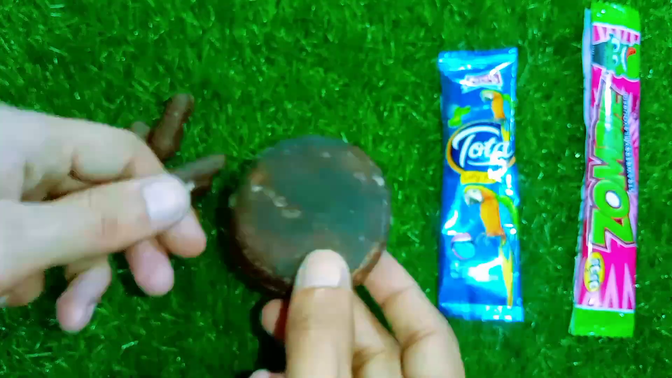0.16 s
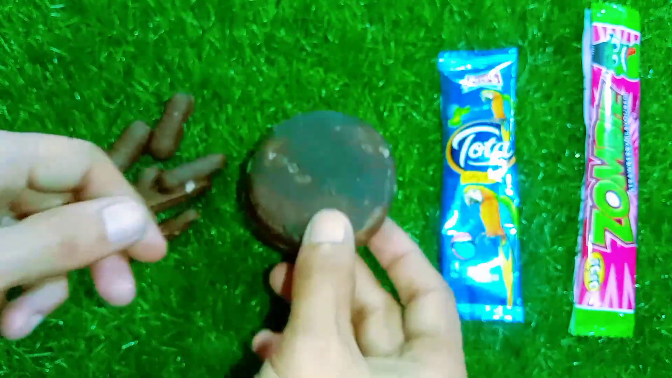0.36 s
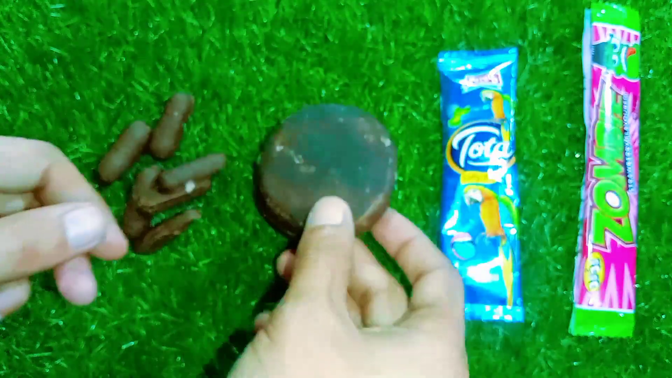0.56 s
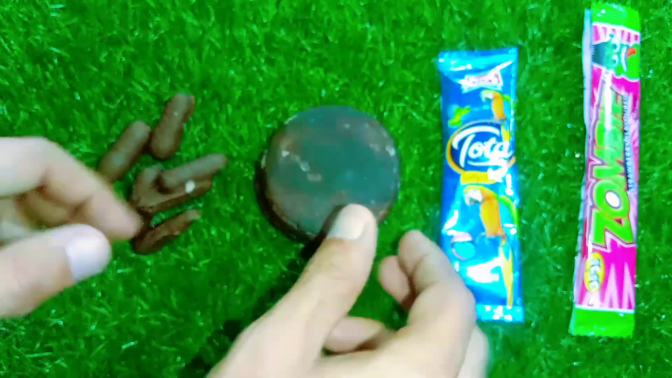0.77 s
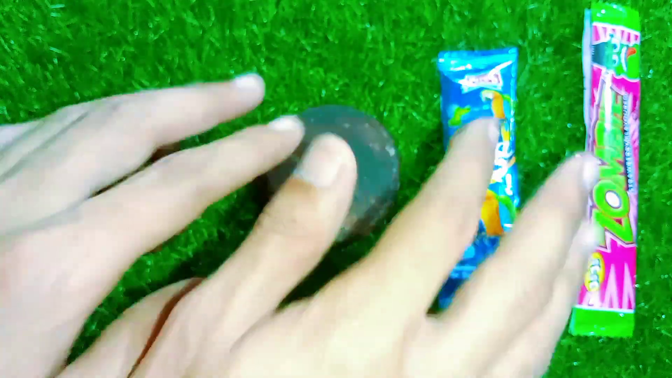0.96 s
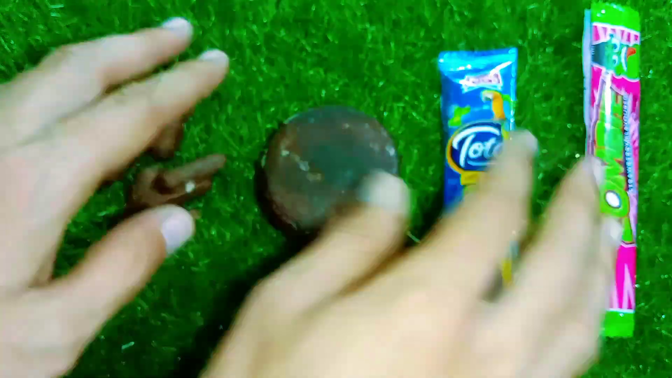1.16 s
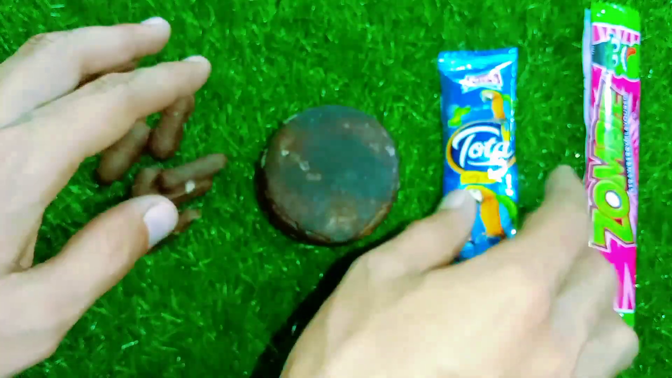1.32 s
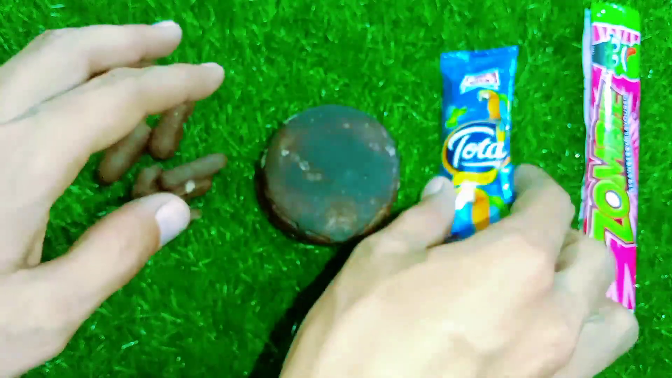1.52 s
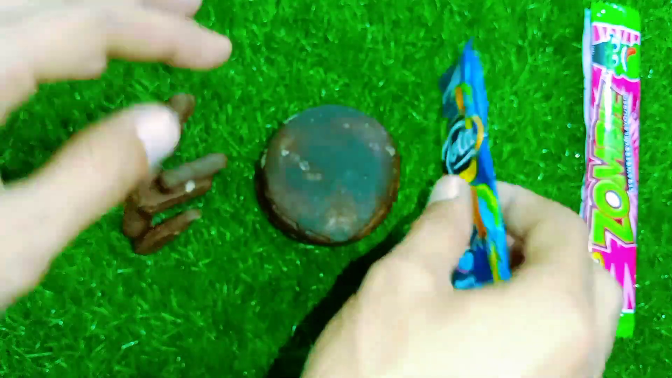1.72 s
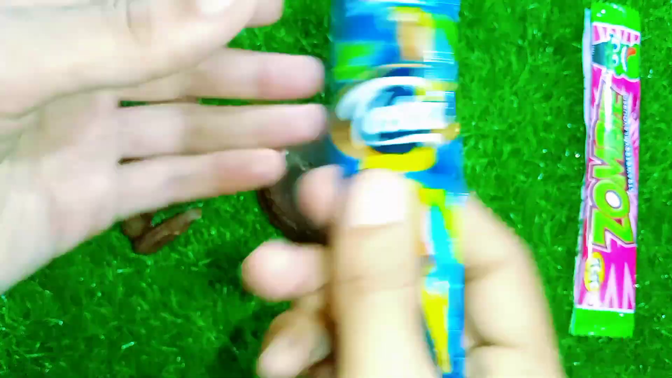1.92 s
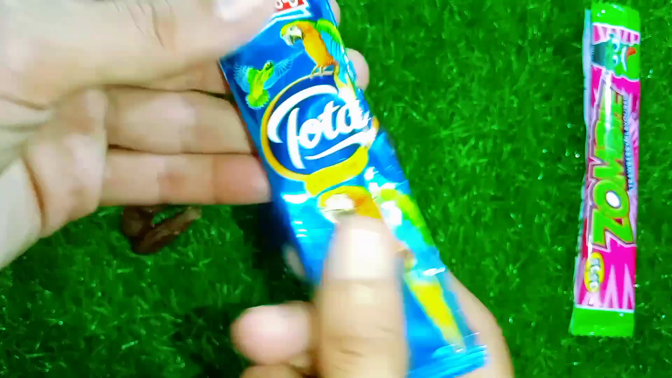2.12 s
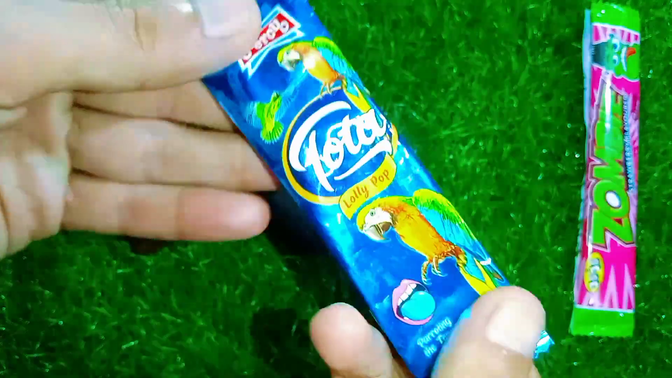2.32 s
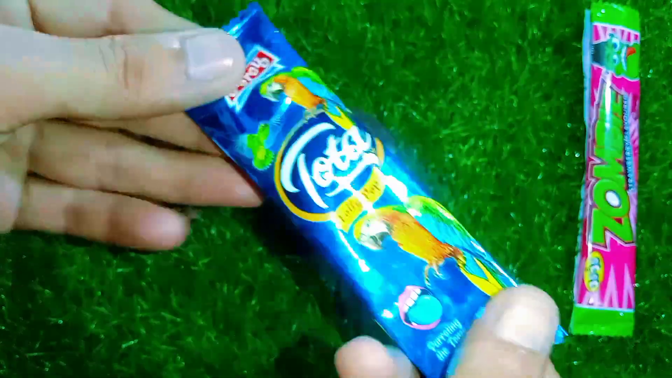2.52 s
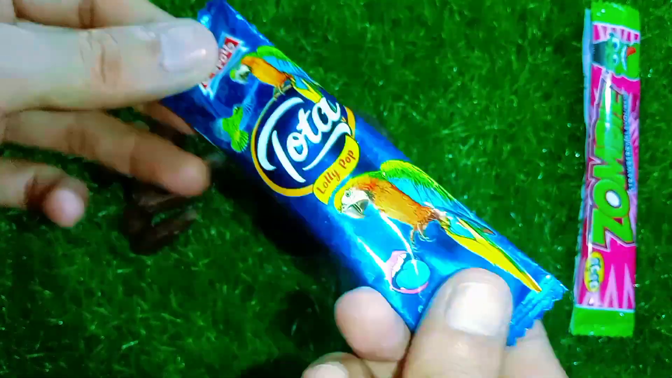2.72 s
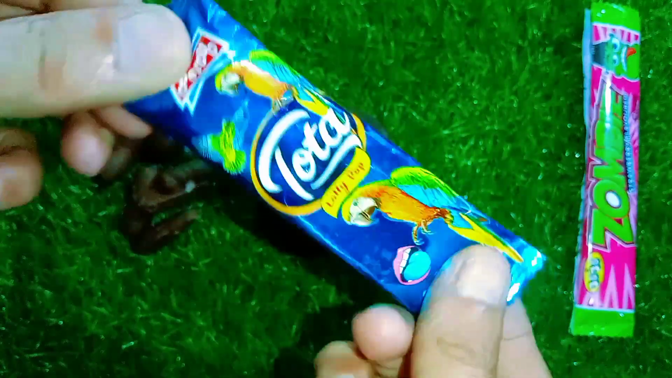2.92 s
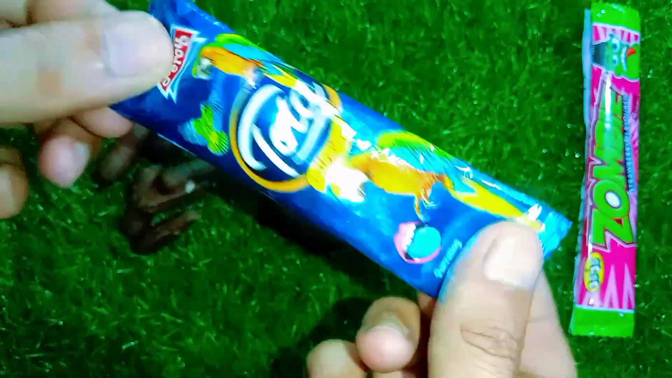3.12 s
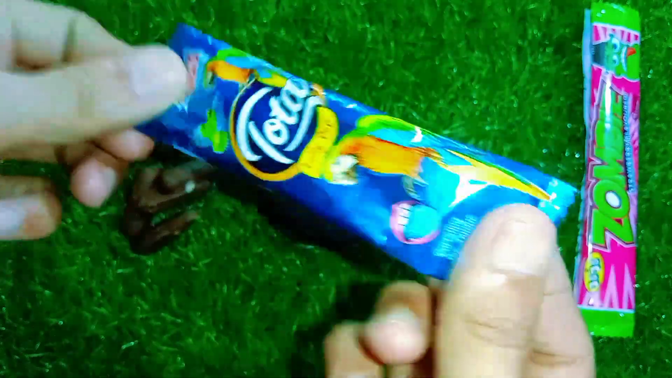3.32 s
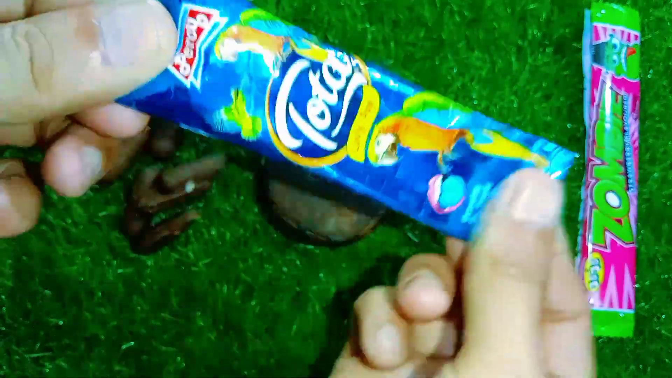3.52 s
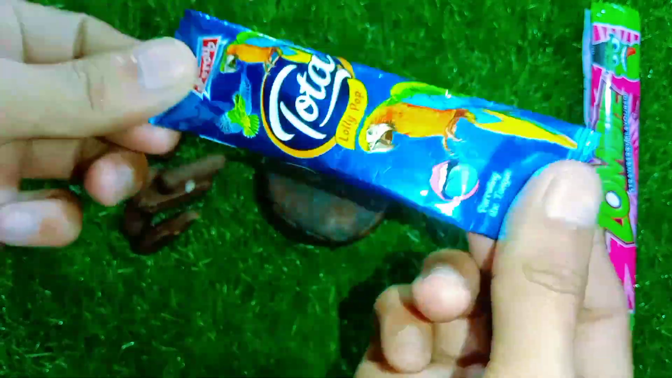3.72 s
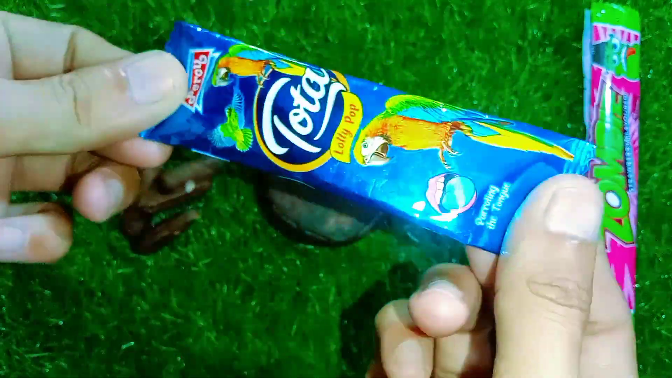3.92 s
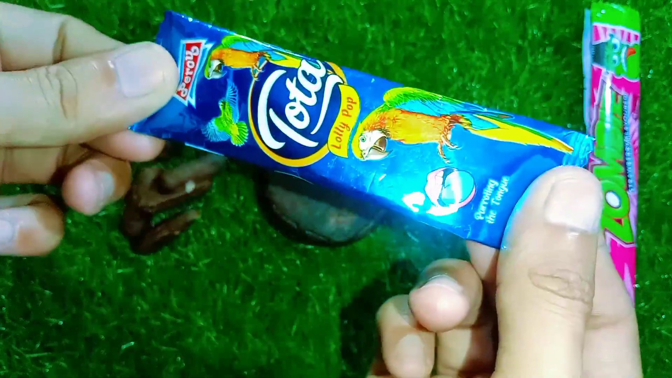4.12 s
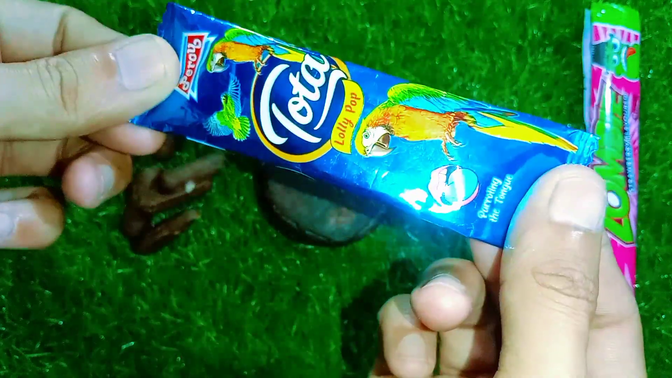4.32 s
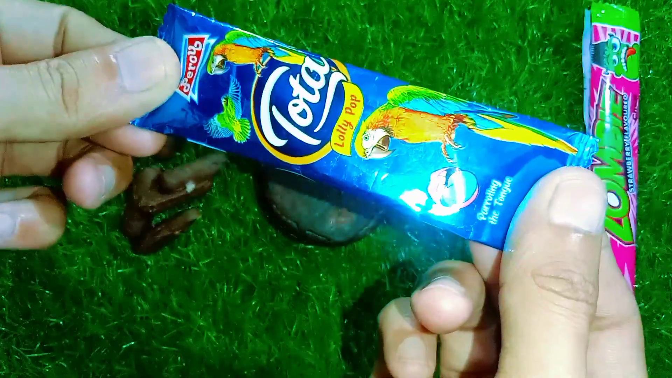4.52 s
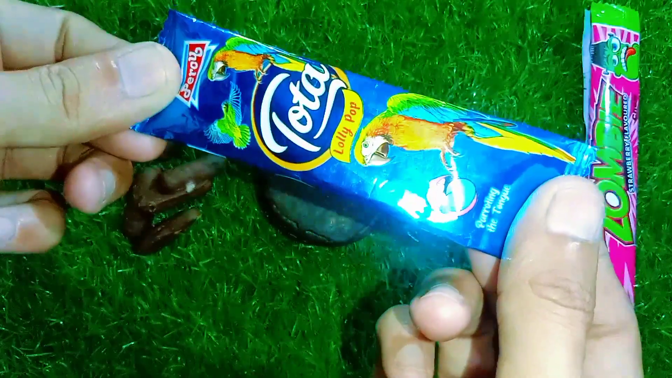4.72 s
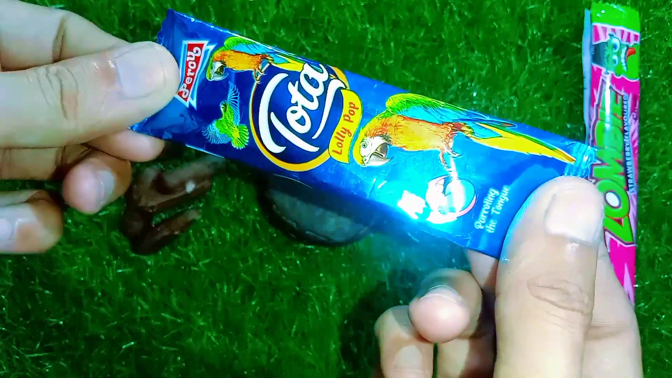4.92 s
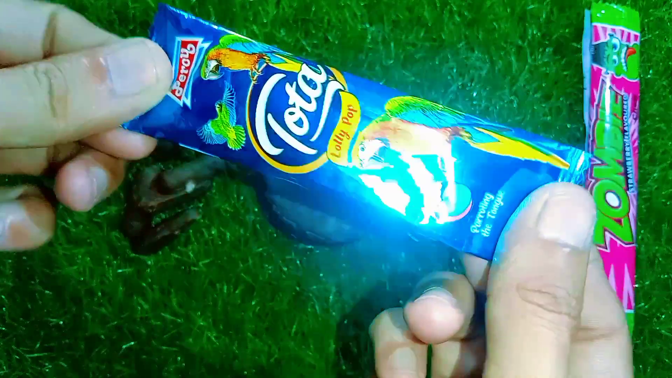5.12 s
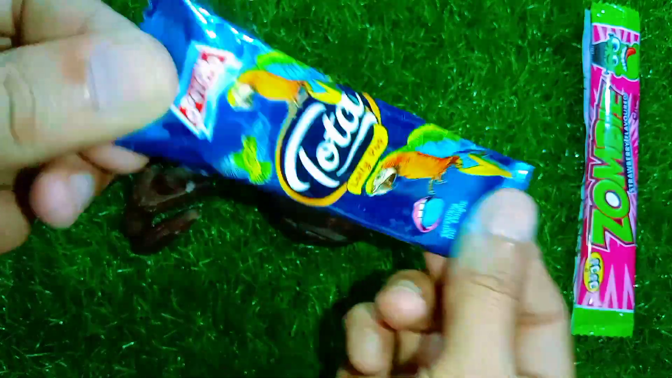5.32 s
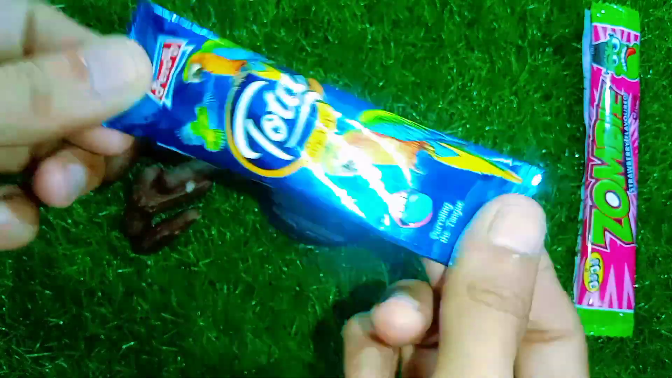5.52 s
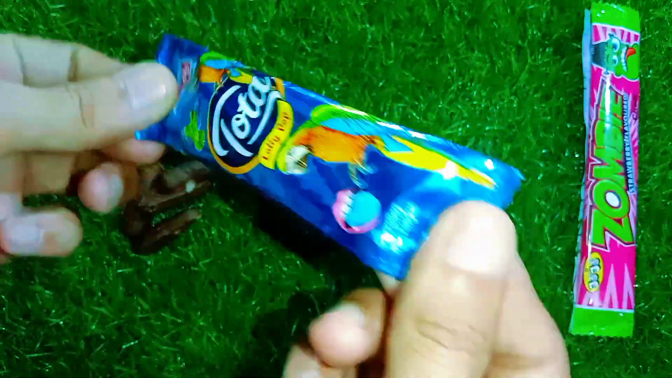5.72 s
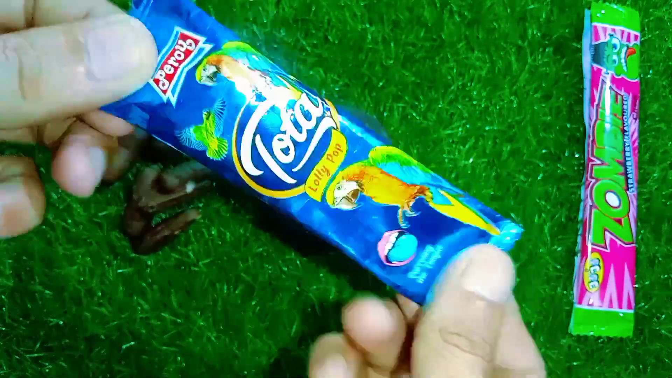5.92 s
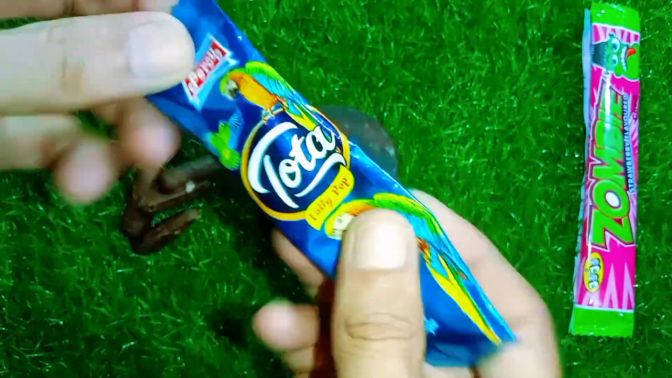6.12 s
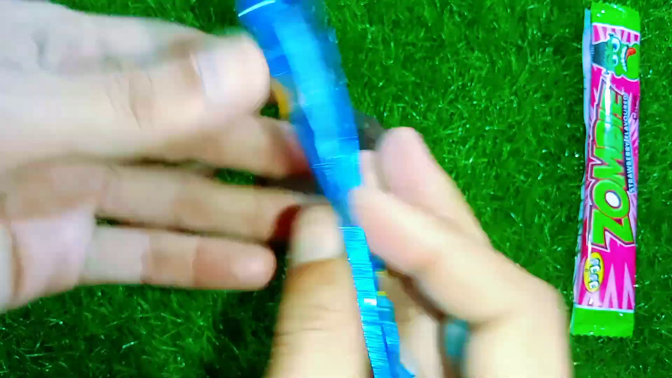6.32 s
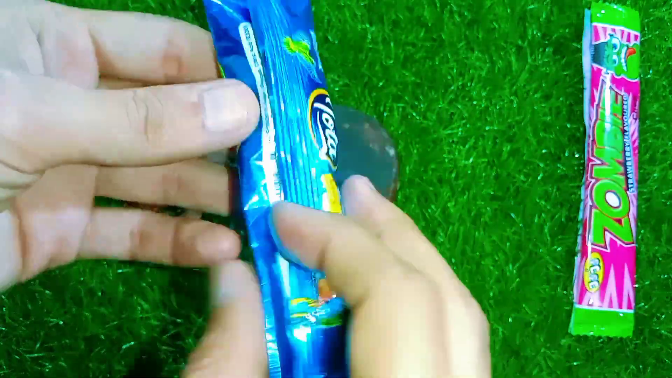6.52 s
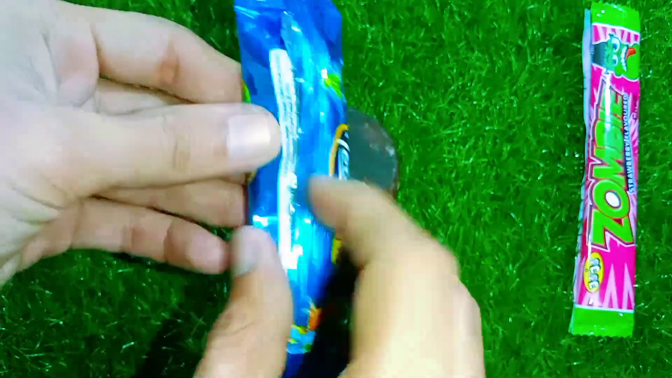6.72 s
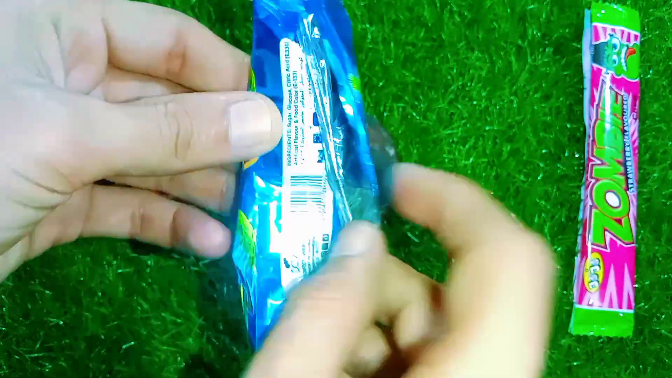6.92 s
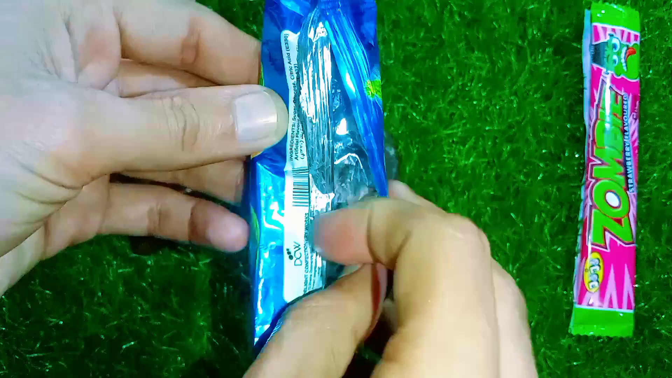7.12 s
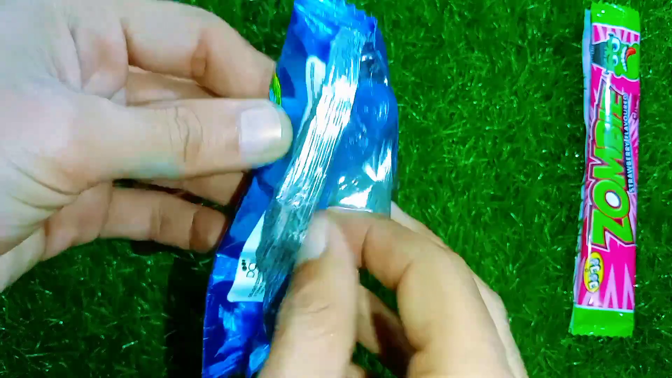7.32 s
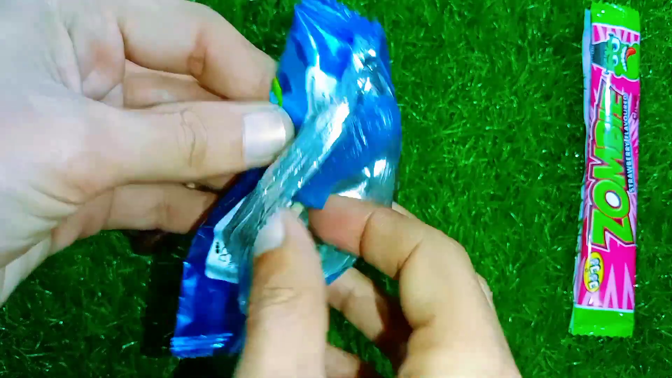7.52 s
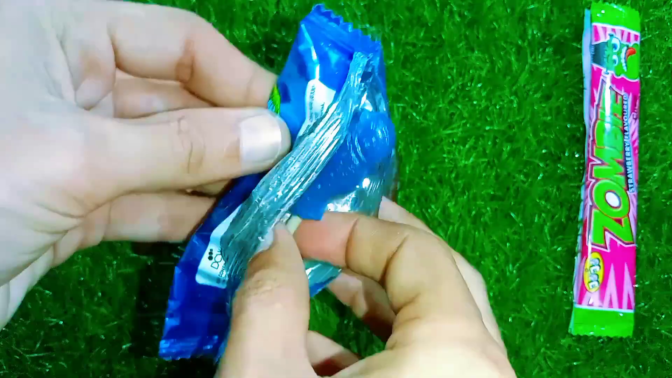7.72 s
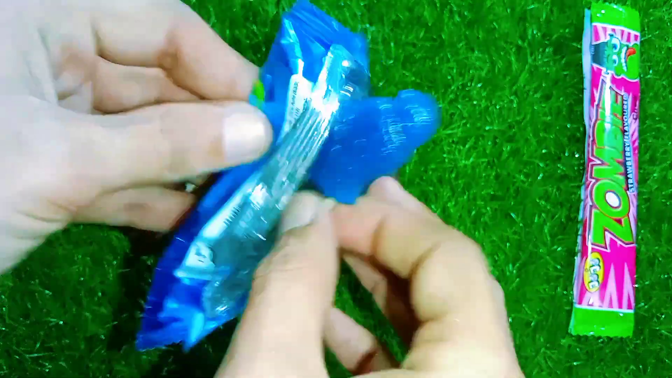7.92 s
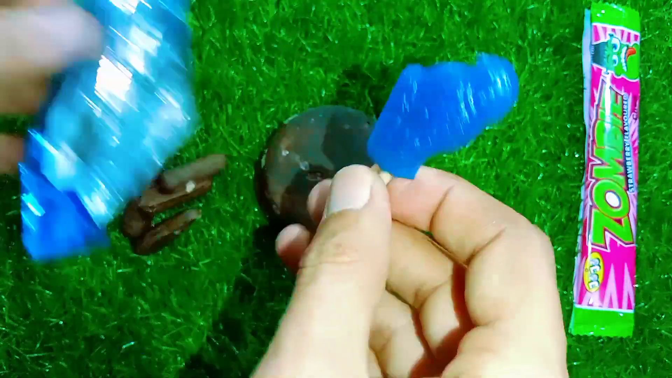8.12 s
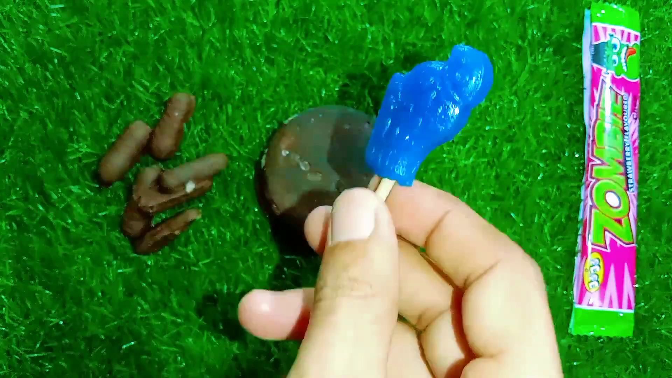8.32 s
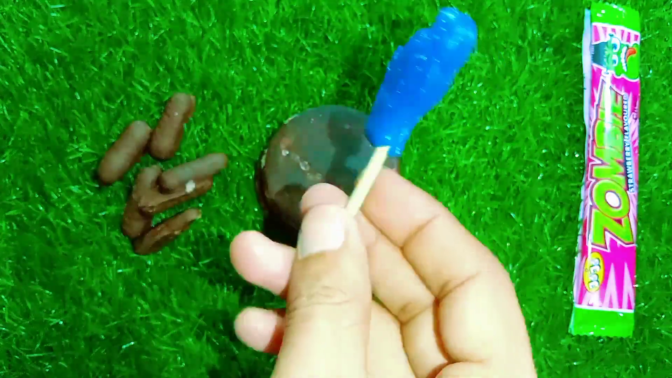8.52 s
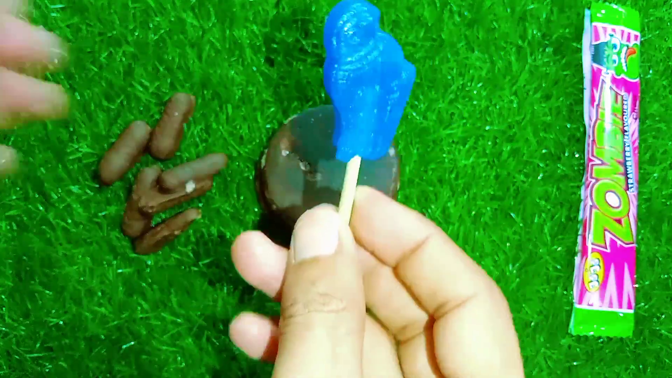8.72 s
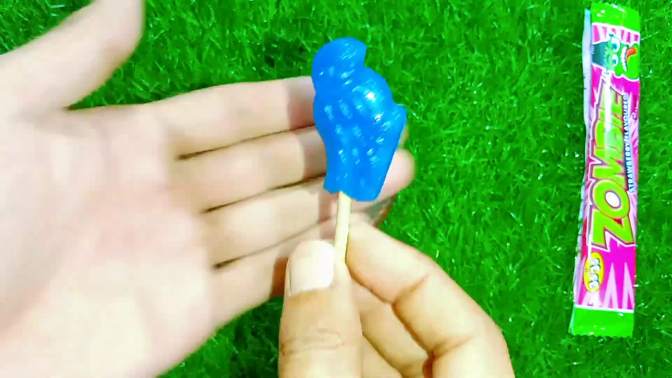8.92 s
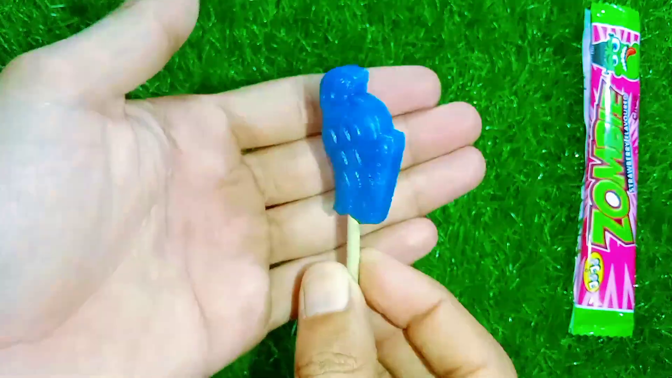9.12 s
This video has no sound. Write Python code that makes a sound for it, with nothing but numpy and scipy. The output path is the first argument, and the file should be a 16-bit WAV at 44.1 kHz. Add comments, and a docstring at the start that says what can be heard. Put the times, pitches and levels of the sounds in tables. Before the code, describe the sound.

Close, crisp crackling of a plastic candy wrapper being turned and pulled open in two spells, in a quiet room.

```python
"""A small plastic sweet wrapper, handled close to a phone microphone in a quiet room.
First only faint, flickering room tone. From 1.5 s fingers turn, squeeze and tear the film: each crease
that buckles snaps, smaller ones shower in between, and panels of the pouch pop with a hollow ring.
The hand rests from about 4 s, works harder from 5.2 s, is loudest at 7.4 s and trails off after 8.5 s.
Throughout, the microphone port rings near 5 kHz and the room adds a short tail."""
import sys
import numpy as np
from scipy import signal
from scipy.fft import rfft, irfft, next_fast_len
from scipy.io import wavfile
from scipy.ndimage import uniform_filter1d

SR = 44100
rng = np.random.default_rng(int(sys.argv[2]) if len(sys.argv) > 2 else 0)


def transcribe(u):
    """Save the signal u as a 16-bit wav file named by the first command-line argument.

    u: samples, shape (n,) or (channels, n), limited to [-1, 1]; the rate is SR.
    q: integer samples, one column per channel.
    """
    v = np.clip(np.atleast_2d(u).T, -1, 1)
    q = np.round(v * 32767).astype(np.int16)
    wavfile.write(sys.argv[1], SR, q)


N = 403999
GRAIN, PLACES = 1024, 8  # samples in one snap or pop; places on the wrapper with their own echoes


def undb(db):
    """Decibels to gain."""
    return 10 ** (np.asarray(db) / 20)


def colour(points, size):
    """Gain on the bins of a transform, from (Hz, dB) points joined on a log axis."""
    hz, db = np.transpose(points)
    return undb(np.interp(np.log(np.arange(size // 2 + 1) * SR / size + 1), np.log(hz), db))


def causal(gain):
    """The same gain with the least delay, so nothing sounds before the blow."""
    cepstrum = irfft(np.log(gain + 1e-9))
    cepstrum[1:len(cepstrum) // 2] *= 2
    cepstrum[len(cepstrum) // 2 + 1:] = 0
    return np.exp(rfft(cepstrum))


def walk(per_s):
    """A glide between random levels, with a spread near 1."""
    hold = int(SR / per_s)
    return uniform_filter1d(np.repeat(rng.standard_normal(N // hold + 1), hold), hold)[:N]


def spread(start, grains):
    """Lay the grains out in time, taking the places on the wrapper in turn, one row a place."""
    at = (start + np.arange(len(start)) % PLACES * (N + GRAIN))[:, None] + np.arange(GRAIN)
    return np.bincount(at.ravel(), grains.ravel(), PLACES * (N + GRAIN)).reshape(PLACES, -1)[:, :N]


# Spectrum of the quiet room at the microphone: frequency_hz, relative_db
ROOM_COLOUR = [(30, -28.5), (88, -16.5), (221, -9.5), (300, -10), (355, -6.5), (540, -18), (990, -14),
               (1350, -10), (1650, -17.5), (2230, -18.5), (3770, -18), (4300, -25.5), (5250, -12),
               (7090, -33.5), (16000, -39)]


def room_tone(level_db=-59.5, flicker_db=.6, patch_db=1.6, mains_db=-77.5):
    """Bands of room noise over a 100 Hz mains hum; the upper ones flicker in brief patches."""
    size, air = next_fast_len(N), 0
    hz = np.arange(size // 2 + 1) * SR / size
    noise = rfft(rng.standard_normal(size)) * colour(ROOM_COLOUR, size)
    edges_hz = np.r_[0, 200 * 2 ** np.arange(0, 6.1, .125), SR]
    patches = walk(16)
    for low, high in zip(edges_hz[:-1], edges_hz[1:]):
        band = irfft(noise * ((hz >= low) & (hz < high)), size)[:N]
        waver_db = flicker_db * walk(15) + (low > 2200) * patch_db * (patches + walk(18))
        air = air + undb(waver_db) * band
    mains = undb(mains_db) * np.sin(2 * np.pi * 100 * np.arange(N) / SR)
    return air * undb(level_db) / np.std(air) + mains


# Faint low hums in the room: centre_s, pitch_hz, level_db, length_s
ROOM_HUMS = [(1.374, 224.4, -56, 0.1), (1.758, 232, -53, 0.045), (2.962, 150, -56, 0.04),
             (3.851, 354, -54, 0.036), (4.584, 223.5, -55.5, 0.066), (5.348, 350.2, -55.5, .06),
             (6.67, 351.8, -50, 0.043), (7.097, 345.5, -48.5, 0.059), (7.603, 240, -52, 0.043),
             (8.844, 149.9, -58, 0.093)]


def hums():
    """Short soft tones swell and fade in the room tone."""
    t = np.arange(N) / SR
    return sum(undb(db) * np.exp(-(2 * (t - centre_s) / length_s) ** 2) * np.sin(2 * np.pi * hz * t)
               for centre_s, hz, db, length_s in ROOM_HUMS)


def echoes(places, near_db=-28, near_t60=0.035, far_db=-40, far_t60=0.18, boom_hz=350, boom_db=16):
    """Hands and table reflect at once, the walls follow, and a low room resonance answers."""
    t = np.arange(SR // 4) / SR
    fade = undb(near_db - 60 * t / near_t60) + undb(far_db - 60 * t / far_t60)
    paths = rng.standard_normal((PLACES, len(t))) * fade * (t > .001)
    wet = (places + signal.fftconvolve(places, paths, axes=1)[:, :N]).sum(axis=0)
    return wet + undb(boom_db) * signal.lfilter(*signal.iirpeak(boom_hz, Q=8.0, fs=SR), wet)


# Finger squeezes, close to the microphone:
# hardest_s, rustle_db, build_s, release_s, deep_share_db, hollow_hz
FINGER_SQUEEZES = [(1.618, -38.5, .062, 0.72, -16.5, 1000), (1.827, -35.5, 0.054, .12, -18, 1300),
                   (2.025, -41, 0.208, 0.046, -24.5, 1500), (2.107, -28.5, 0.022, 0.26, -16, 960),
                   (2.313, -29, 0.093, 0.055, -20.5, 1000), (2.472, -46.5, 0.052, 0.47, -16.5, 1400),
                   (2.688, -42.5, 0.041, .11, -17, 1500), (2.91, -27, 0.065, .052, -13, 800),
                   (3.01, -50.5, 0.19, 0.38, -13.5, 665), (3.214, -24, 0.13, 0.15, -16, 750),
                   (3.472, -25.5, 0.13, 0.061, -15.5, 680), (3.695, -34.5, 0.17, .14, -13.5, 850),
                   (5.211, -50.5, .035, .2, -13.5, 1200), (5.295, -29, 0.08, .09, -15, 750),
                   (5.555, -32.5, 0.054, 0.24, -13, 734), (5.822, -42, 0.027, 0.81, -21, 1400),
                   (5.976, -26, 0.063, .12, -21.5, 1100), (6.114, -21, 0.041, 0.28, -19, 663.3),
                   (6.495, -21, 0.36, .052, -18.5, 992), (6.668, -39, 0.6, 0.16, -16.5, 1100),
                   (6.782, -19.5, 0.025, 0.19, -16.5, 720), (7.04, -18.5, 0.32, 0.044, -17.5, 802),
                   (7.099, -29.5, 0.062, 0.052, -16.5, 750), (7.154, -34, 0.042, .25, -13.5, 649),
                   (7.339, -19.5, .27, 0.083, -13, 650), (7.544, -29.5, 0.0755, 0.47, -14, 735),
                   (7.867, -21.5, 0.065, 0.12, -17, 720), (7.969, -25, 0.13, 0.016, -8.5, 703.6),
                   (8.43, -37.5, 0.073, 0.18, -16, 550), (8.556, -40.5, 0.051, 0.043, -17.5, 1000),
                   (9.13, -56.5, 0.029, 0.47, -14, 1000)]


def grip(t, slack_db=25, deepen_db=2, rise_octaves=1.1):
    """Rustle level, deep share and pitch of the pouch's hollow, set by the strongest squeeze at times t."""
    hardest_s, rustle_db, build_s, release_s, deep_db, hollow_hz = np.transpose(FINGER_SQUEEZES)[:, :, None]
    away = np.maximum((hardest_s - t) / np.abs(build_s), (t - hardest_s) / np.abs(release_s))
    level_db = rustle_db - slack_db * np.maximum(away, away ** 3)  # dies fast outside the squeeze
    strongest = level_db.argmax(axis=0), np.arange(len(t))
    slack = np.minimum(away, 1)
    deep_db = deep_db + deepen_db * slack
    hollow_hz = hollow_hz * 2 ** (rise_octaves * slack)
    return level_db[strongest], deep_db[strongest], hollow_hz[strongest]


# Large panels of the pouch popping at close range: start_s, level_db, pitch_hz
PANEL_POPS = [(2.213, -41.5, 810), (2.864, -44.5, 1120), (2.921, -34, 1000), (3.178, -28.5, 810),
              (3.472, -42.5, 700), (3.685, -37.5, 1240), (6.115, -24.5, 1277), (6.396, -36, 1290),
              (6.489, -36, 1090), (6.777, -27, 1210), (6.815, -31, 790), (7.211, -30, 814),
              (7.271, -29, 1280), (7.31, -31, 860), (7.371, -15, 785.6), (7.487, -30, 1300),
              (7.557, -27, 1300), (7.617, -28, 690), (7.85, -34, 832.5), (7.898, -30, 745),
              (7.968, -28.5, 1330), (8.419, -42, 610)]


def pops(t60=0.053, rise_s=0.0098, detune_share=0.11):
    """A panel flips and rings briefly on a cluster of three close tones."""
    start_s, level_db, pitch_hz = np.transpose(PANEL_POPS)[:, :, None]
    t = np.arange(GRAIN) / SR
    detune = 1 + detune_share * (.5 + rng.random((len(start_s), 3, 1))) * np.array([[-1], [0], [2]])
    tones = np.sin(2 * np.pi * pitch_hz[:, None] * detune * t).sum(axis=1)
    envelope = (1 - np.exp(-t / rise_s)) * undb(level_db - 60 * t / t60)
    taper = np.cos(np.pi * t * SR / GRAIN / 2)
    return spread((start_s[:, 0] * SR).astype(int), tones * envelope * taper)


# Spectrum of a close snap, with the microphone port's ring near 5 kHz: frequency_hz, relative_db
SNAP_COLOUR = [(120, -66), (200, -6.5), (348, -12.5), (434, -31), (814, -25), (909, -33), (1610, -20),
               (2650, -17.5), (3130, -10.5), (4210, -12.5), (5250, 0), (8330, -25.5), (14500, -11.5),
               (16500, -31)]


def creases(times, parts_db, burst_s=.0004, deep_hz=2803, thin_hz=7480, hollow_q=1.9):
    """A crease buckles in a burst of slips; parts_db sets the peaks of its main, deep and thin bands."""
    t, hz = np.arange(GRAIN) / SR, np.arange(GRAIN // 2 + 1) * SR / GRAIN
    chance = rng.standard_normal((len(times), GRAIN + 3))
    scatter, noise = np.exp(.4 * chance[:, :3]), chance[:, 3:]
    age = t / (burst_s * scatter[:, :1])
    deep = 1 / (1 + (hz / deep_hz) ** 6)
    thin = 1 / (1 + (thin_hz / (hz + 1)) ** 12)
    # the air in the pouch rings at its hollow pitch and cuts what lies below
    _, _, hollow_hz = grip(times)
    ratio = 1j * hz / hollow_hz[:, None]
    rings = (ratio ** 2 / (ratio ** 2 + ratio / hollow_q + 1)) ** 2
    # the facets beside a crease ring at pitches set by their size
    for facet_hz in (1250 * scatter[:, 1:2], 4200 * scatter[:, 2:3]):
        rings = rings * (1 + 1.5 / (1 + 12j * (hz / facet_hz - 1)))
    grains = 0
    for band, peak_db, linger in zip((1 - deep - thin, deep, thin), parts_db, (1.2, 4.0, .8)):
        slips = rfft(noise * age * np.exp(-age / linger))  # the deep band lets go most slowly
        part = irfft(slips * rings * causal(colour(SNAP_COLOUR, GRAIN) * np.abs(band)))
        grains = grains + part * (undb(peak_db) / np.abs(part).max(axis=1))[:, None]
    start = (times * SR).astype(int) - np.abs(grains).argmax(axis=1)  # each peak lands on its time
    return spread(start, grains)


def rustle(per_s=380, scatter_db=4.5, colour_db=12, still_db=-80):
    """Small creases buckle at random while the hand works: many faint, few strong, each its own colour."""
    chance = rng.random((int(per_s * N / SR), 4))
    times = chance[:, 0] * N / SR
    moving = grip(times)[0] > still_db
    times, (faintness, deep, thin) = times[moving], chance[moving, 1:].T
    level_db, deep_share_db, _ = grip(times)
    main_db = level_db - 1.5 - scatter_db * np.log(faintness + 0.043)
    deep_db = main_db + deep_share_db + colour_db * (deep - .5)
    thin_db = main_db - 12 + colour_db * (thin - .5)
    return creases(times, (main_db, deep_db, thin_db))


# Creases that snap clearly, right at the microphone: peak_s, main_db, thin_db
CREASE_SNAPS = [(1.562, -34.5, -43), (1.61, -14, -23.5), (1.7002, -19.5, -29), (1.809, -15.5, -25),
                (1.8267, -11.5, -23), (1.8538, -16.5, -24.5), (1.8953, -21, -51), (2.0205, -14.5, -31),
                (2.1082, -14, -31), (2.1347, -32, -41.5), (2.1822, -22.5, -34.5), (2.2135, -3, -14.5),
                (2.3005, -20, -30), (2.316, -15, -28), (2.358, -17.5, -25.5), (2.45, -33.5, -37),
                (2.4669, -24.5, -37), (2.4922, -33, -43), (2.5637, -23.5, -28), (2.5818, -25, -37),
                (2.629, -21, -29.5), (2.6722, -21, -29), (2.6917, -13, -21), (2.749, -11, -19),
                (2.8327, -24, -32), (2.867, -14, -26.5), (2.8988, -10, -18), (2.9162, -11, -25.5),
                (2.9653, -11, -17), (2.983, -21, -22.5), (3.004, -10.5, -26), (3.0717, -24.5, -34),
                (3.1101, -19.5, -27), (3.1556, -10.5, -21.5), (3.1793, -15, -23), (3.2105, -17.5, -20),
                (3.2223, -13, -30), (3.2617, -10.5, -20.5), (3.311, -24.5, -31), (3.4036, -24, -27.5),
                (3.43, -19.5, -17), (3.458, -9.5, -17.5), (3.4737, -11.5, -18), (3.4789, -9.5, -22.5),
                (3.5138, -3, -11.5), (3.5806, -25.5, -35), (3.6122, -19, -33.5), (3.687, -8.5, -21.5),
                (3.72, -17.5, -19.5), (3.778, -23, -28.5), (5.211, -30.5, -38), (5.269, -16, -20),
                (5.285, -8, -23), (5.3032, -10, -20), (5.3321, -13, -19.5), (5.383, -27.5, -39.5),
                (5.489, -31.5, -48), (5.516, -33, -34.5), (5.5496, -11, -22), (5.5591, -10, -22),
                (5.59, -15.5, -26), (5.5999, -16.5, -23), (5.6208, -20, -41), (5.6449, -18.5, -25),
                (5.6836, -16, -28.5), (5.7018, -16.5, -26), (5.773, -32, -35), (5.8136, -27.5, -25),
                (5.852, -30, -36), (5.883, -17, -28), (5.9244, -24.5, -43), (5.938, -21, -31),
                (5.9698, -5, -17), (6.0329, -9, -17), (6.1051, -6.5, -13.5), (6.1205, -8.5, -12.5),
                (6.1704, -8.5, -21), (6.1875, -9, -16.5), (6.209, -18, -22), (6.2402, -6, -13),
                (6.2728, -25, -28.5), (6.2978, -12, -20.5), (6.3338, -16, -21), (6.3549, -14.5, -31),
                (6.3691, -10, -20.5), (6.3974, -11, -19), (6.4212, -4, -15.5), (6.4818, -10.5, -18),
                (6.5034, -9.5, -21), (6.5895, -22.5, -28), (6.6001, -8.5, -35), (6.607, -10, -24.5),
                (6.6669, -12.5, -25), (6.7717, -5.5, -18), (6.7763, -7, -31), (6.7865, -27, -26),
                (6.825, -18.5, -28), (6.8473, -12.5, -24), (6.916, -15, -26), (6.9425, -16.5, -35),
                (7.0098, -16.5, -24), (7.0346, -11, -19), (7.087, -9, -24), (7.102, -6.5, -23.5),
                (7.1477, -6, -17), (7.155, -21.5, -29), (7.2118, -8, -20), (7.2724, -6.5, -24.5),
                (7.2966, -6, -15), (7.3323, -10.5, -26.5), (7.3375, -7.5, -16), (7.372, 1.5, -14.5),
                (7.3892, -12.5, -46), (7.4791, -21.5, -25), (7.4895, -15, -47), (7.506, -12, -16.5),
                (7.5175, -8.5, -20), (7.546, -6.5, -8.5), (7.5863, -17, -22), (7.619, -28, -27),
                (7.6615, -8, -16.5), (7.675, -16, -24.5), (7.706, -19.5, -28.5), (7.7523, -16.5, -22.5),
                (7.838, -14.5, -26), (7.871, -11.5, -18.5), (7.9159, -15, -30), (7.9272, -3.5, -19),
                (7.9362, -16, -25), (7.9441, -12.5, -28), (7.96, -13.5, -15.5), (8.0767, -42.5, -43.5),
                (8.1346, -36.5, -48.5), (8.1466, -30, -42), (8.236, -41, -84), (8.2544, -46.5, -52.5),
                (8.367, -29.5, -64), (8.3878, -19, -29), (8.42, -8.5, -14), (8.502, -30, -41),
                (8.5497, -22, -35)]


def snaps():
    """Single creases buckle sharply, as deep as the part of the film in hand."""
    peak_s, main_db, thin_db = np.transpose(CREASE_SNAPS)
    _, deep_share_db, _ = grip(peak_s)
    return creases(peak_s, (main_db, main_db - 8.0 + deep_share_db, thin_db))


def scene():
    """The wrapper up close and the room behind it, in mono."""
    wrapper = snaps() + rustle() + pops()
    return (echoes(wrapper) + room_tone() + hums())[None]


def suppressor(x, strength=0.73, floor_db=-10, open_db=-50, knee_db=3, depth_db=7):
    """The phone takes steady noise out of the treble and turns everything down when nothing stands out."""
    hz, _, bins = signal.stft(x, SR, nperseg=512)
    power = uniform_filter1d(np.abs(bins) ** 2, size=5, axis=-1)
    power = uniform_filter1d(power, size=3, axis=-2) + 1e-20
    steady = np.percentile(power, 25, axis=-1, keepdims=True) * (hz[:, None] > 2000)
    gain = np.maximum(1 - strength * steady / power, undb(floor_db))
    clean = signal.istft(bins * gain, nperseg=512)[1][:, :N]
    loud_db = 10 * np.log10(uniform_filter1d(x ** 2, int(.04 * SR)) + 1e-12)
    return clean * undb(-depth_db / (1 + np.exp((loud_db - open_db) / knee_db)))


def record(dry, shelf_hz=15400, top_hz=16500):
    """The phone suppresses the room tone, rounds the peaks, thins the highest treble and cuts the top."""
    rounded = 0.98 * np.tanh(suppressor(dry) / 0.89)
    dulled = signal.sosfiltfilt(signal.cheby1(10, .3, shelf_hz, fs=SR, output="sos"), rounded)
    shelved = .6 * dulled + .4 * rounded
    return signal.sosfilt(signal.ellip(10, .2, 70, top_hz, fs=SR, output="sos"), shelved)


dry = scene()
out = record(dry)
transcribe(out)
```